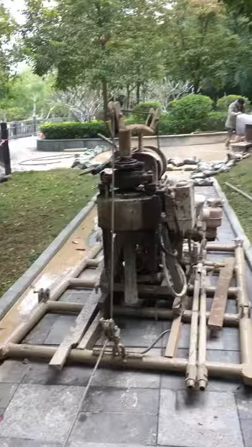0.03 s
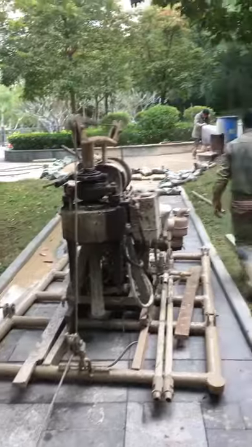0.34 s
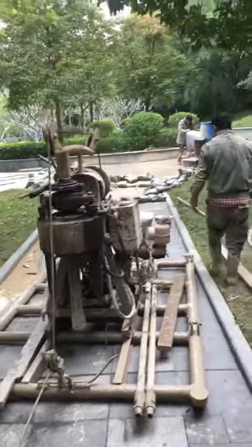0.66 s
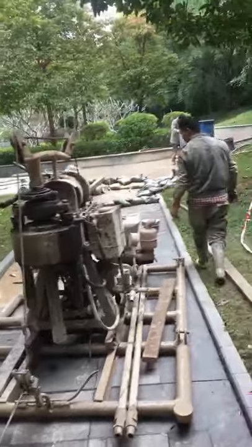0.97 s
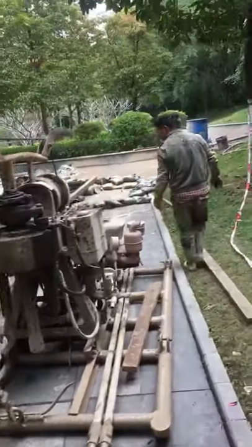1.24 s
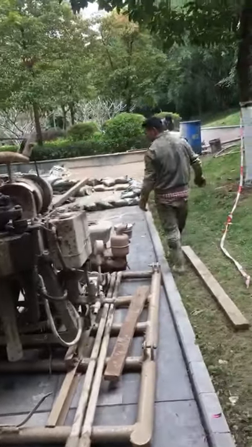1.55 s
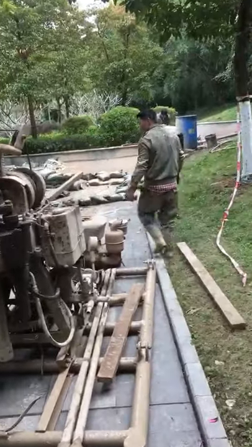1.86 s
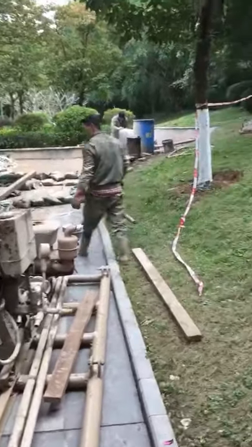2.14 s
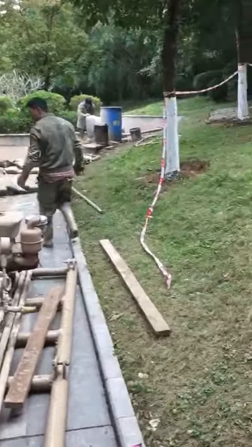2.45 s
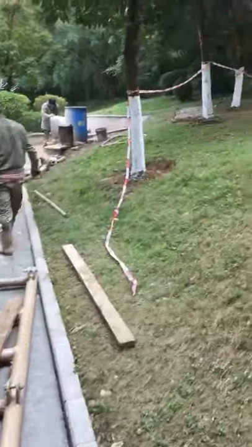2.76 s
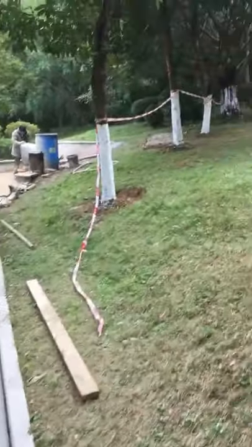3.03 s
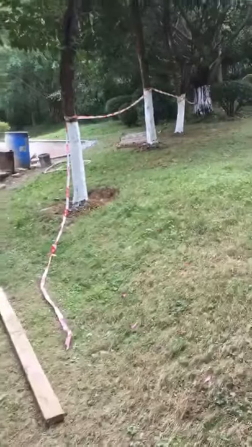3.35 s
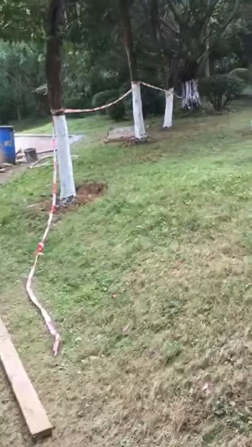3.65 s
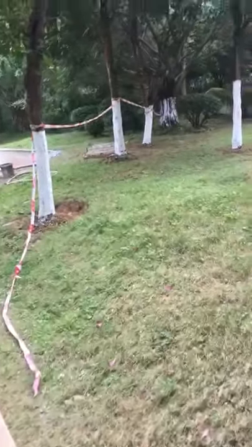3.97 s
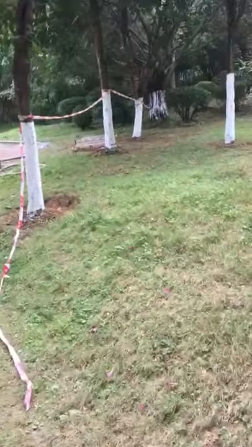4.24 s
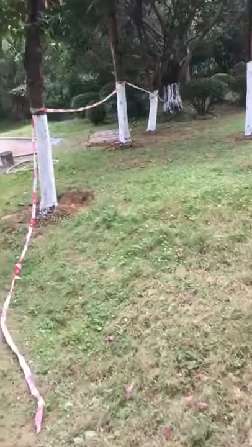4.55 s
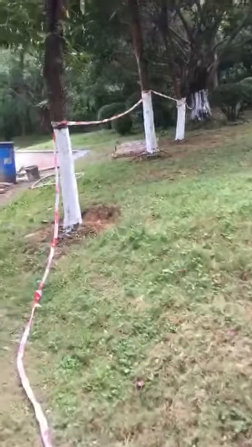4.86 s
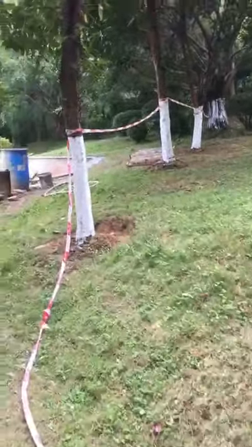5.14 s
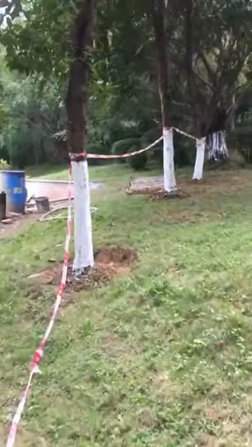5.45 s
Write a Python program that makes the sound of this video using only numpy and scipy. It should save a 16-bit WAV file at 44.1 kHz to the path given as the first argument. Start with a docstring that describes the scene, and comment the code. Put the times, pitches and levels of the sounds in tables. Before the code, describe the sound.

A loud one-cylinder diesel engine on a drilling rig chugs steadily outdoors, its loose metal covers rattling more as it grows louder.

```python
"""Diesel engine on a drilling rig

A one-cylinder diesel chugs outdoors, a little under six firings a second. Each firing knocks the
engine block and rattles the loose frame and sheet covers; then the exhaust thumps and the valves
tick twice. It grows louder and rattles more as the microphone moves along the rig."""
import sys
import numpy as np
from scipy import signal
from scipy.io import wavfile

SR = 44100
rng = np.random.default_rng(int(sys.argv[2]) if len(sys.argv) > 2 else 0)


def put_to_file(sound):
    """Save the sound as 16-bit audio at rate SR, in the file named by the first command-line argument."""
    columns = np.atleast_2d(sound).T  # one column per channel
    safe = np.clip(columns, -1, 1)
    whole_steps = np.round(safe * 32767)
    wavfile.write(sys.argv[1], SR, whole_steps.astype(np.int16))


N = 251370
T = np.arange(N) / SR


# blows on the block after each firing: delay_s, rise_s, decay_s, level_db
KNOCKS = [(.002, 0.0057, 0.042, -19.5), (.014, 0.0047, 0.026, -21), (.09, 0.0025, 0.021, -25),
          (.141, .004, 0.009, -24)]
# tone of the knock: pitch_hz, level_db
KNOCK_TONE = [(120, -14.5), (250, 2.5), (350, -0.5), (450, -7), (590, -5), (750, 2), (950, 4), (1250, -1.5),
              (1480, 2), (1900, -4.5), (2600, -11.5), (4400, -10.5), (5000, -20.5), (9000, -25.5)]
# notes at which the cast block and its base ring: pitch_hz, width_hz, level_db
BLOCK_NOTES = [(172, 16.2, 0), (209.3, 9.9, 6.5), (782, 96, -6.5), (892.4, 19.5, 4.5), (1005, 48, 1),
               (1115, 48, 2.5), (1345, 21, 0), (1469, 24, 1.5)]
# cracks of fuel spraying in and igniting, then the piston's slap: delay_s, rise_s, decay_s, level_db
CRACKS = [(.002, 0.0018, 0.017, -26.5), (.014, 0.0045, 0.015, -21), (.03, .01, 0.085, -33),
          (.158, 0.01, 0.0099, -37.5)]
# tone of the cracks: pitch_hz, level_db
CRACK_TONE = [(1000, -18), (3000, -12), (4400, 15.5), (5000, -1), (6300, 16.5), (7500, 4), (10000, 7),
              (10500, 3), (11400, 11.5), (13000, -2), (16000, -4)]

def engine_block(knock_db, first_db):
    """Burning fuel knocks the block and makes it ring, over the steady clatter of its gears."""
    running = glide(knock_db)
    force = np.hypot(strokes(KNOCKS, knock_db, first_db, uneven_db=0.97), amp(-30) * running)
    knock = strike(force, impacts(per_s=3500, spread_db=2), shaped, KNOCK_TONE)
    ring = strike(np.sqrt(force * running), impacts(per_s=3000, spread_db=0.5), ringing, BLOCK_NOTES)
    crack_force = strokes(CRACKS, 1.4 * knock_db, first_db, uneven_db=1.8)
    crack = strike(crack_force, impacts(per_s=5000, spread_db=4), shaped, CRACK_TONE)
    return knock + amp(-20) * ring + crack


# bursts of rattling at each firing: delay_s, rise_s, decay_s, level_db
RATTLES = [(-.001, 0.0089, 0.049, -5), (.0155, 0.003, .022, 0.6), (.04, 0.022, .05, -9),
           (.14, 0.0038, 0.013, -17.5)]
# notes of the frame, loose cover, thin guard and long-ringing steel: pitch_hz, width_hz, level_db
FRAME_NOTES = [(2148, 107, -4), (2935, 190, -6.5), (3495, 155, 0)]
COVER_NOTES = [(4015, 168, 7.5), (4122, 140, 3.5)]
GUARD_NOTES = [(5646, 203, 3.5), (5990, 170, -2.5), (6770, 310, -20), (8610, 480, -17.5), (10100, 270, -17),
               (11330, 270, -8.5)]
STEEL_NOTES = [(2918, 14, 1), (3000, 18, -2), (5664, 18, -3), (5865, 30, -7), (5996, 22, -2),
               (11410, 22, -15), (11562, 22, -12.5)]

def loose_metal(first_db):
    """Frame, cover and guard rattle at each firing and shake until the next; some steel rings on."""
    frame_db = levels(near=1.06, side=0, uneven_db=1.35)
    cover_db = levels(near=0.43, side=0.76, uneven_db=1.8)
    shake_db = levels(near=0.8, side=0.26, uneven_db=5)
    guard_db = levels(near=0.093, side=1, uneven_db=1.9)
    frame_rattle = amp(-17) * strokes(RATTLES, frame_db, first_db, uneven_db=-0.4)
    cover_rattle = amp(-15.5) * strokes(RATTLES, cover_db, first_db, uneven_db=-0.6)
    guard_rattle = amp(-20) * strokes(RATTLES, guard_db, first_db, uneven_db=1)
    # hypot adds two forces by their power: here the bursts and the steady shaking
    frame_force = np.hypot(frame_rattle, amp(-31.5) * glide(frame_db))
    cover_force = np.hypot(cover_rattle, amp(-30.5) * glide(shake_db))
    guard_force = np.hypot(guard_rattle, amp(-36) * glide(guard_db))
    cover_hits = np.hypot(cover_force, amp(-2) * clanks())
    guard_hits = np.hypot(guard_force, amp(-12) * clanks())
    frame = strike(frame_force, impacts(per_s=2000, spread_db=3.5), ringing, FRAME_NOTES)
    cover = strike(cover_hits, impacts(per_s=2300, spread_db=1), ringing, COVER_NOTES)
    guard = strike(guard_hits, impacts(per_s=2400, spread_db=5.5), ringing, GUARD_NOTES)
    steel = strike(frame_force + guard_force, impacts(per_s=2000, spread_db=4), ringing, STEEL_NOTES)
    steel_gain = amp(-12.5) * glide(levels(near=0.96, side=0, uneven_db=-0.5))
    return frame + cover + guard + steel_gain * steel


# the hardest clanks of the loose cover: start_s, level_db
CLANKS = [(0.403, -12), (0.893, -15.5), (2.354, -14), (2.497, -13.5), (2.732, -13), (3.293, -8),
          (3.846, -12), (4.358, -6.5), (4.904, -9.5), (5.539, -5.5), (5.564, -3.5), (5.678, -10.5)]

def clanks():
    """The force of the cover hitting its stop now and then."""
    force = np.zeros(N)
    for start_s, db in CLANKS:
        a, b = np.searchsorted(T, [start_s - 0.002, start_s + 0.06])
        force[a:b] += amp(db) * blow(T[a:b] - T[a], rise_s=0.0025, decay_s=0.011)
    return force


# puffs of exhaust after each firing: delay_s, pitch_hz, half_length_s, level_db
EXHAUST_PUFFS = [(0.0617, 69, 0.01, -16.5), (0.03, 66, 0.0055, -24.5), (.049, 131, 0.0063, -23),
                 (0.0823, 58, 0.019, -30)]
# dull thuds of the mounts and air intake: delay_s, pitch_hz, half_length_s, level_db
THUDS = [(.019, 365, 0.0058, -19.5), (.039, 220, 0.0085, -22.5), (.0995, 193, 0.0056, -22),
         (.1, 78, 0.0073, -29), (.115, 127, 0.012, -26), (.152, 172, .012, -20.5),
         (.153, 68, 0.0084, -25.5)]
# hollow bump of the casing: delay_s, pitch_hz, half_length_s, level_db
BUMPS = [(.097, 355, 0.0056, -35.5)]

def chug():
    """The exhaust thumps once per firing, among lighter thuds and bumps."""
    exhaust_db = levels(near=0.73, side=0.25, uneven_db=1.2)
    exhaust = puffs(EXHAUST_PUFFS, exhaust_db, jitter_s=0.00081, detune=0.027, uneven_db=0.6)
    thud_db = levels(near=0.42, side=-0.28, uneven_db=0)
    thuds = puffs(THUDS, thud_db, jitter_s=0.00049, detune=0.059, uneven_db=0.16)
    bump_db = levels(near=2.1, side=2.4, uneven_db=0)
    bumps = puffs(BUMPS, bump_db, jitter_s=0.00071, detune=0.045, uneven_db=4.5)
    return exhaust + thuds + bumps


# the two valve ticks after each firing: delay_s, rise_s, decay_s, level_db
TICKS = [(.087, 0.0067, 0.0053, -24.5), (.1385, 0.006, 0.0071, -23.5)]
# tone of the ticks: pitch_hz, level_db
TICK_TONE = [(2000, -8.5), (5000, 2.5), (6500, 2), (8000, -5.5), (9500, 0), (10500, -8), (12000, 2),
             (14000, -1.5), (16000, -1.5)]

def valves():
    """The levers that work the valves close their gaps with two short, bright ticks."""
    tick_db = levels(near=1.44, side=0.087, uneven_db=1.7)
    force = strokes(TICKS, tick_db, np.zeros_like(tick_db), uneven_db=0.5)
    return strike(force, impacts(per_s=11000, spread_db=1.6), shaped, TICK_TONE)


# note of a panel on the engine's base: pitch_hz, width_hz, level_db
PANEL_NOTE = [(509.2, 13.5, 0)]

def panel():
    """The engine keeps a panel shaking; its drone grows as the microphone comes near."""
    shaking = amp(-44.5) * glide(levels(near=1.7, side=0, uneven_db=0.4))
    return shaking * ringing(impacts(per_s=3000, spread_db=0), PANEL_NOTE)


# tones of the hiss and of the rumble: pitch_hz, level_db
HISS_TONE = [(100, -10), (200, -8), (400, -10.5), (1000, -4.5), (2500, -15.5), (5000, -33), (6200, -15.5),
             (7500, -30.5), (10500, -34), (12000, -22), (16000, -24.5)]
RUMBLE_TONE = [(15, -22), (30, -4), (52, 4.5), (80, -6), (130, -3), (260, -20.5), (600, -44)]

def hiss_and_rumble(knock_db):
    """Belts and gears hiss; the skid under the engine rumbles, hardest after each knock."""
    hiss = amp(-32) * glide(knock_db) * shaped(impacts(per_s=7000, spread_db=2), HISS_TONE)
    skid_db = levels(near=0.49, side=0, uneven_db=0.6)
    jolts = amp(-13) * strokes(KNOCKS, skid_db, np.zeros_like(skid_db), uneven_db=2.5)
    shaking = np.hypot(amp(-37.5) * glide(skid_db), jolts)
    return hiss + shaking * shaped(rng.standard_normal(N), RUMBLE_TONE)


# how late the echo off the paving arrives: time_s, delay_s
ECHO_DELAY = [(0, 0.0031), (2.2, 0.00265), (3.4, 0.00223), (5.7, 0.0018)]

def paving_echo(x, echo_gain=0.091, dull_hz=1200):
    """The paving adds a dull echo whose delay shrinks as the microphone moves."""
    delay_s = np.interp(T, *np.transpose(ECHO_DELAY))
    dull = signal.sosfilt(signal.butter(1, dull_hz, fs=SR, output="sos"), x)
    return x + echo_gain * np.interp(T - delay_s, T, dull)


# engine speed, held nearly steady by its governor: time_s, firings_per_s
SPEED = [(0, 5.5658), (0.4, 5.6038), (0.8, 5.627), (1.95, 5.6531), (2.65, 5.477), (3.55, 5.7839),
         (4.05, 5.599), (4.7, 5.5694), (5.7, 5.7342)]

def firings(first_s=0.043):
    """The times of the firings: one whenever the engine completes a cycle."""
    cycles = np.cumsum(np.interp(T, *np.transpose(SPEED))) / SR
    cycles -= np.interp(first_s, T, cycles)
    return np.interp(np.arange(np.ceil(cycles[-1])), cycles, T)


# loudness of the engine as the microphone moves along the rig: time_s, level_db
NEARNESS = [(0, -1.7), (1.8, -0.7), (3.1, 1.6), (4.3, 2.5), (5.3, 3.5), (5.6, -1)]
# extra loudness as the microphone comes round to the sheet-metal side: time_s, level_db
SHEET_SIDE = [(0, 0.5), (3.6, -1), (4.5, 1.5), (5.2, 5), (5.7, 6.5)]

def levels(near, side, uneven_db):
    """A part's level in dB at each firing: its share of the two curves above, plus chance."""
    times = firings()
    near_db = near * np.interp(times, *np.transpose(NEARNESS))
    side_db = side * np.interp(times, *np.transpose(SHEET_SIDE))
    return near_db + side_db + uneven_db * np.clip(rng.standard_normal(len(times)), -2, 2)


def glide(firing_db):
    """A gain that slides from level to level, reaching each about midway between firings."""
    return amp(np.interp(T, firings() + 0.1, firing_db))


def strokes(blows, firing_db, first_db, uneven_db, jitter_s=0.0008):
    """Force over time: each firing repeats the blows, a little early or late, weak or strong."""
    power = np.zeros(N)
    for start_s, level, first in zip(firings(), firing_db, first_db):
        a, b = np.searchsorted(T, [start_s - 0.01, start_s + 0.3])
        for k, (delay_s, rise_s, decay_s, db) in enumerate(blows):
            late, strong = rng.standard_normal(2)
            t = T[a:b] - start_s - delay_s - jitter_s * late
            gain = amp(db + level + first * (k == 0) + uneven_db * strong)
            power[a:b] += (gain * blow(t, rise_s, decay_s)) ** 2
    return np.sqrt(power)


def blow(t, rise_s, decay_s):
    """A force that builds up quickly and dies away."""
    return np.clip(t / rise_s, 0, 1) * np.exp(-np.maximum(t - rise_s, 0) / decay_s)


def puffs(table, firing_db, jitter_s, detune, uneven_db):
    """Short swells of low pressure waves, one set for each firing."""
    out = np.zeros(N)
    for start_s, level in zip(firings(), firing_db):
        a, b = np.searchsorted(T, [start_s - 0.02, start_s + 0.22])
        for delay_s, hz, half_length_s, db in table:
            late, sharp, strong = rng.standard_normal(3)
            t = T[a:b] - start_s - delay_s - jitter_s * late
            wave = np.cos(2 * np.pi * hz * (1 + detune * sharp) * t)
            swell = np.exp(-(t / half_length_s) ** 2)
            out[a:b] += amp(db + level + uneven_db * strong) * swell * wave
    return out


def impacts(per_s, spread_db):
    """A dense stream of tiny metal taps of uneven size."""
    direction, size = rng.standard_normal((2, N))
    hits = rng.random(N) < per_s / SR
    return unit_level(hits * np.sign(direction) * amp(spread_db * np.clip(size, -2, 2)))


def strike(force, taps, body, table):
    """Taps sound through a body: the table sets the tone, the force sets the loudness."""
    return body(force * taps, table) * np.sqrt(np.mean(force ** 2))


def shaped(x, tone):
    """Gives x the balance of low and high pitches in a tone table."""
    pitch_hz, level_db = np.transpose(tone)
    return colour(x, lambda hz: amp(np.interp(np.log(hz + 1), np.log(pitch_hz), level_db)))


def ringing(x, notes):
    """Makes x ring at a part's own notes; narrower notes ring longer."""
    def gain(hz):
        peaks = (amp(db) / (1 + ((hz - pitch) / (width * 0.6)) ** 2) for pitch, width, db in notes)
        return np.sqrt(sum(peak ** 2 for peak in peaks))
    return colour(x, gain)


def colour(x, gain, size=16384):
    """Filters x by a gain for each pitch, so that it rings after a blow, never before."""
    hz = abs(np.fft.fftfreq(size, 1 / SR))
    log_gain = np.log(np.maximum(gain(hz), 1e-5))
    response = np.fft.ifft(np.exp(np.conj(signal.hilbert(log_gain)))).real[:size // 2]
    return unit_level(signal.oaconvolve(x, response)[:N])


def unit_level(x):
    """Scales x to an average (rms) level of one."""
    return x / np.sqrt(np.mean(x ** 2) + 1e-20)


def amp(db):
    """Turns decibels into a gain."""
    return 10 ** (np.asarray(db) / 20)


def scene():
    """All parts of the engine, heard at one microphone."""
    knock_db = levels(near=0.95, side=0, uneven_db=0.4)
    first_db = levels(near=0, side=0, uneven_db=1.23)  # each firing's first blow is harder or softer
    engine = engine_block(knock_db, first_db) + loose_metal(first_db)
    engine += panel() + valves() + chug() + hiss_and_rumble(knock_db)
    return paving_echo(engine)[None]


def record(dry, open_s=0.138, bottom_hz=12, top_hz=15800):
    """The microphone opens after a moment, rounds tall peaks and cuts the very lowest and highest sound."""
    passed = signal.sosfilt(signal.butter(1, bottom_hz, "high", fs=SR, output="sos"), dry)
    opened = passed * np.clip((T - open_s) / 0.001, 0, 1)
    rounded = opened / (1 + opened ** 6) ** (1 / 6)
    treble_cut = signal.firwin(511, top_hz, window=("kaiser", 9), fs=SR)
    return signal.oaconvolve(rounded, treble_cut[None], "same")


dry = scene()
out = record(dry)
put_to_file(out)
```